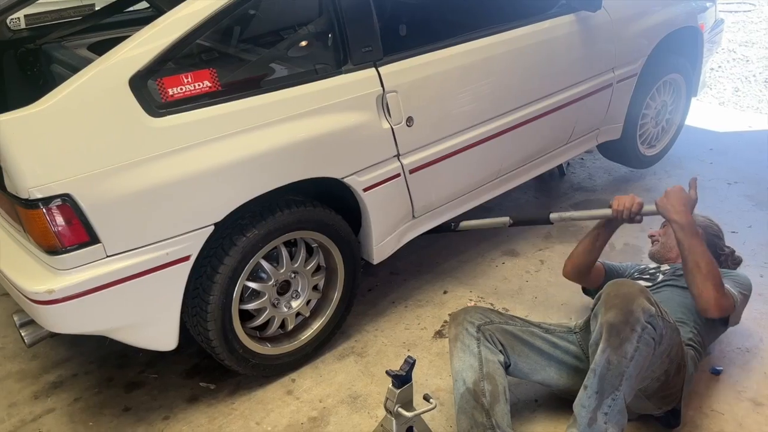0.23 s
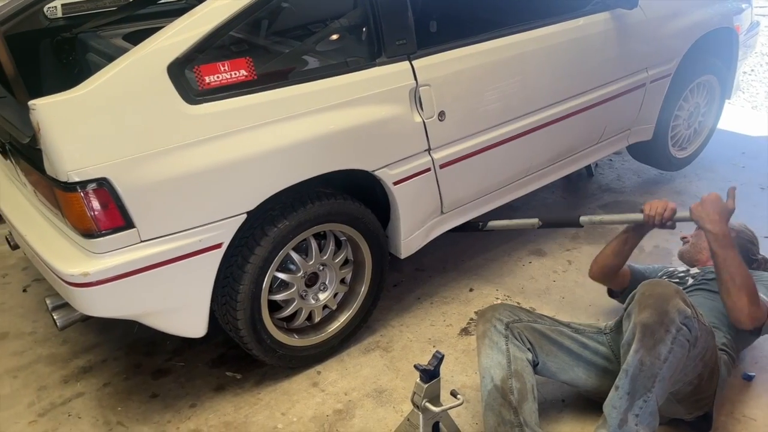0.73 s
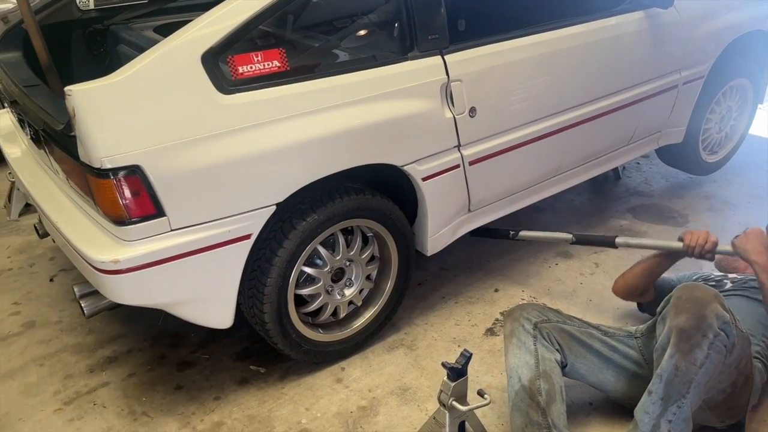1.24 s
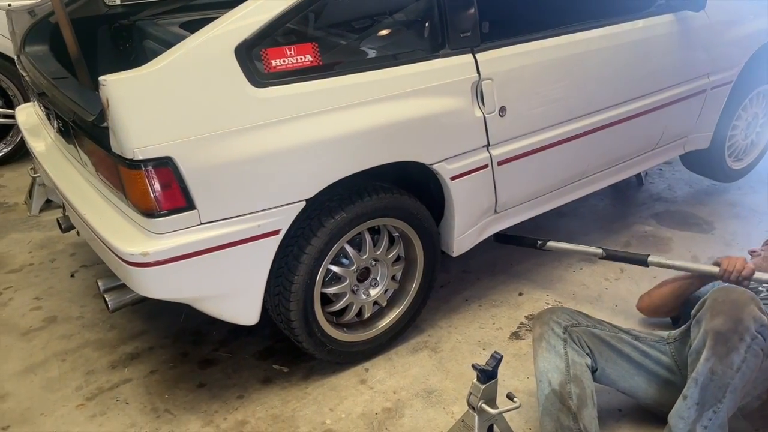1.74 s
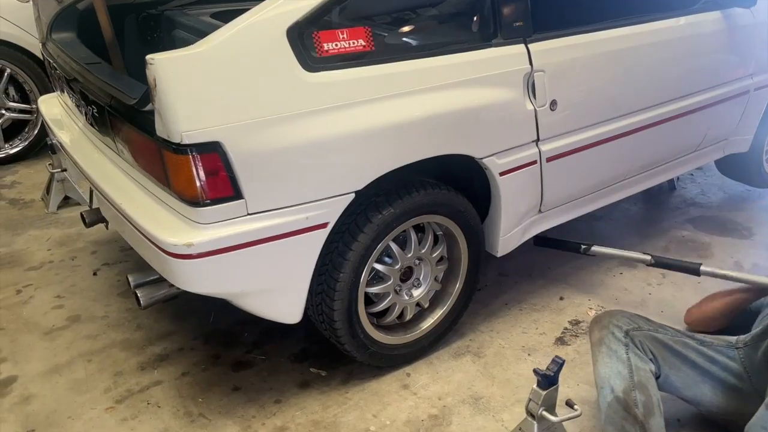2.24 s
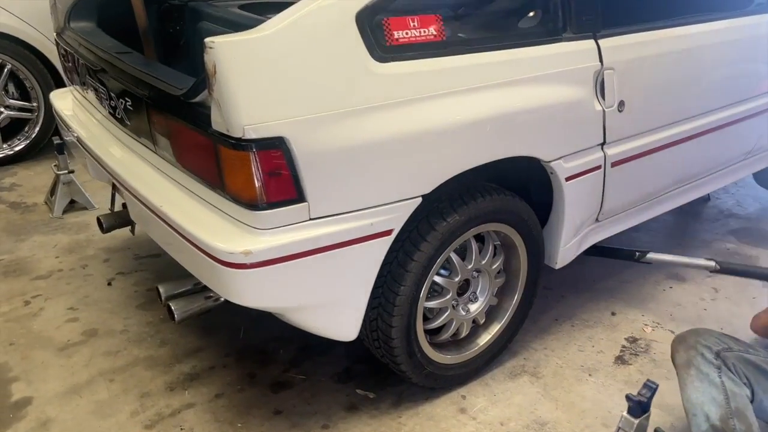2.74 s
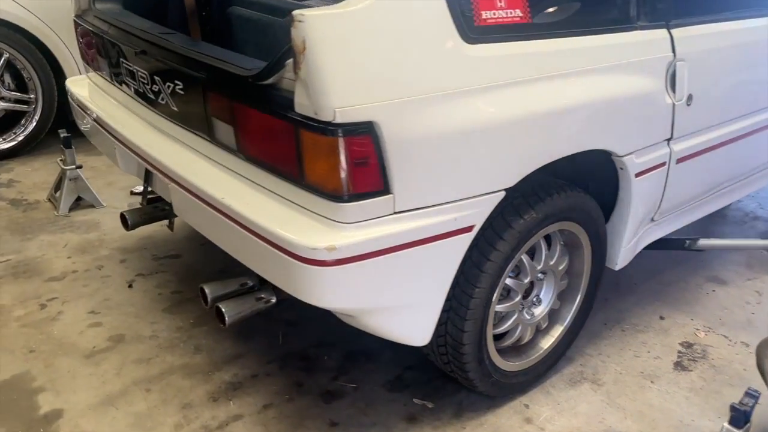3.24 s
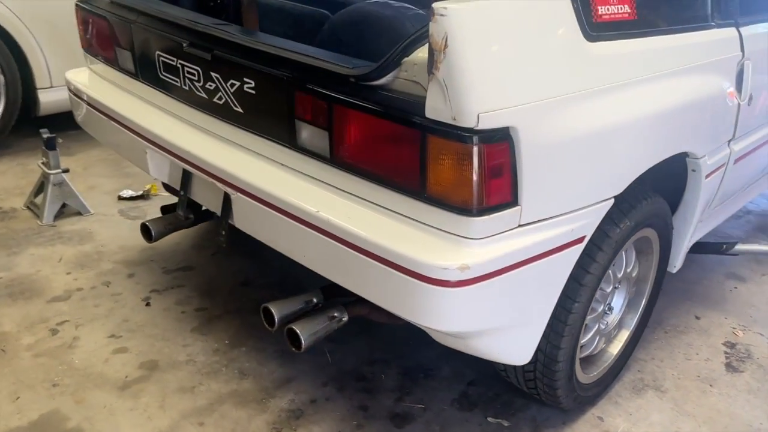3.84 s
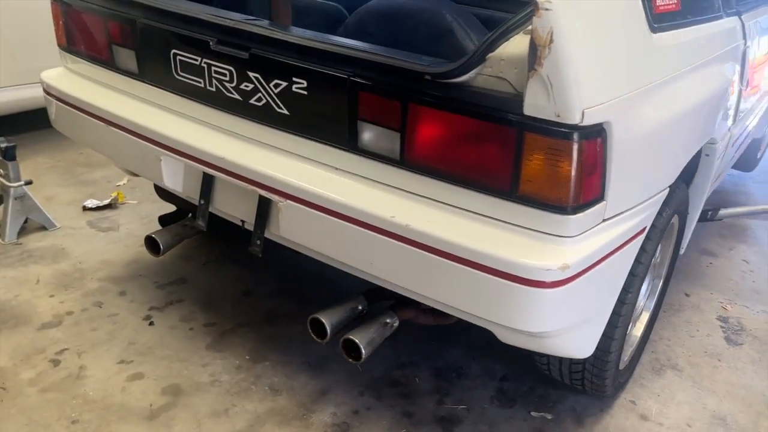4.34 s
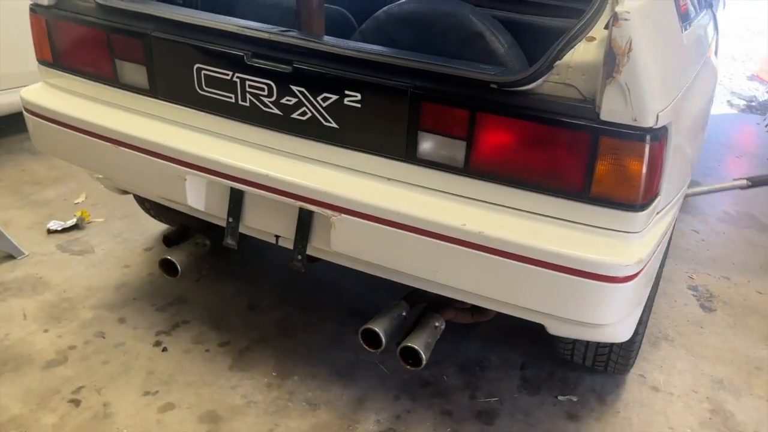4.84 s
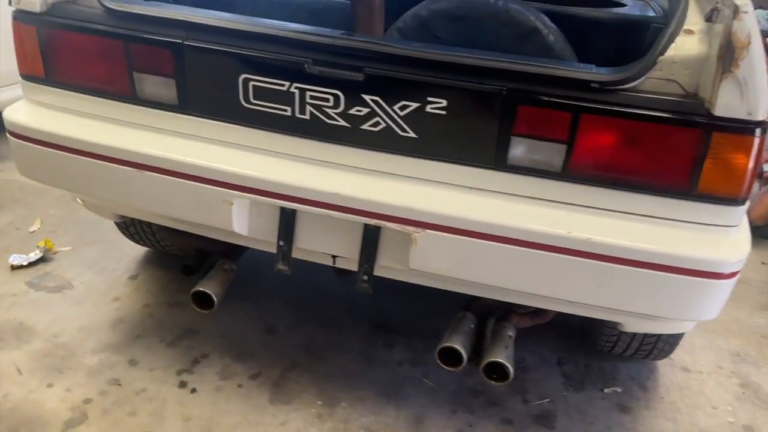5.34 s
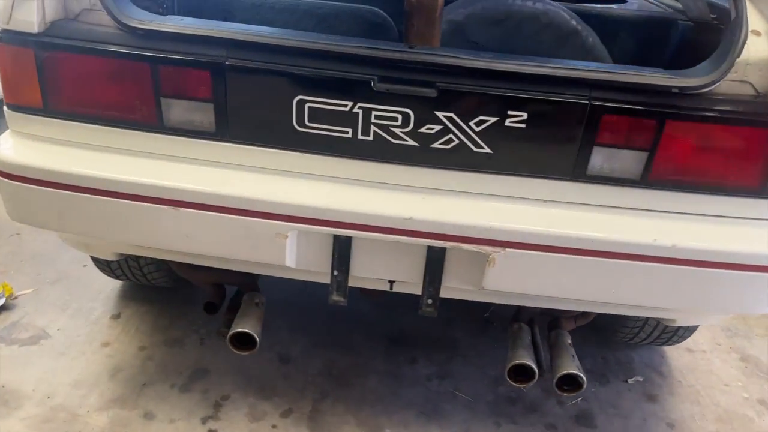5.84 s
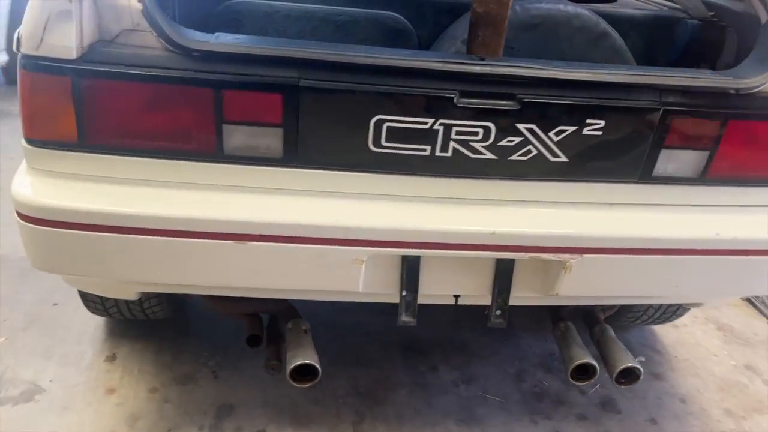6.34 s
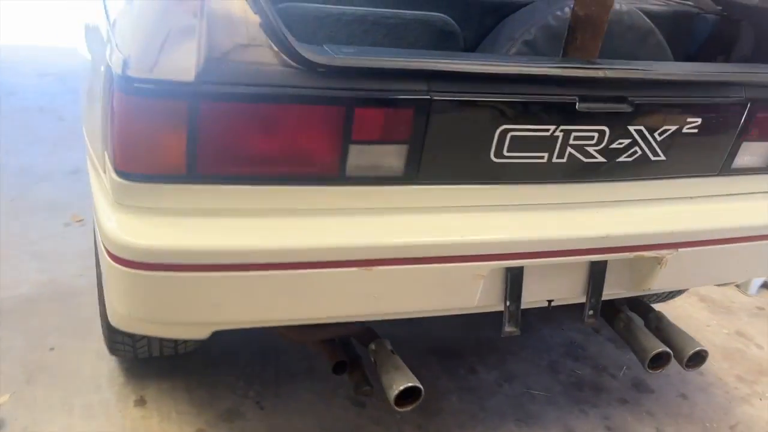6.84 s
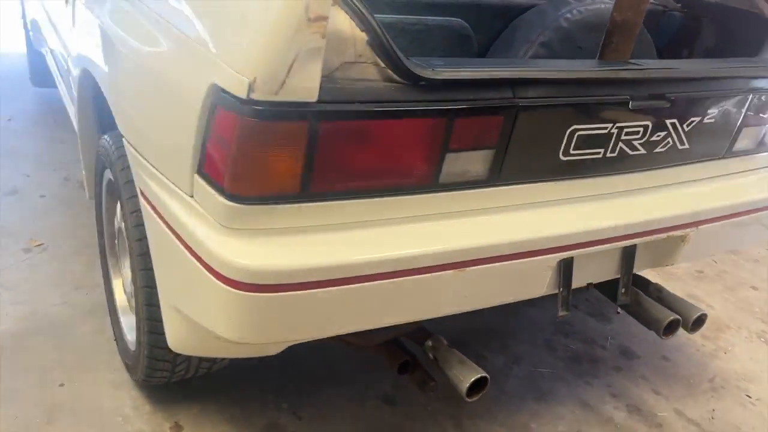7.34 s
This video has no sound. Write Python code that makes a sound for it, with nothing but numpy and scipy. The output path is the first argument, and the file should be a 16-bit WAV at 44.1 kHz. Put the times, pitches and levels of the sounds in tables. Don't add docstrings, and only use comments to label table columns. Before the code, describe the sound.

Close garage perspective, short reverberation. Steady pumping of a jack under a car: slack linkage knocks, a squeaky pin, a hard handle clank, a deep panel thump, then clicking loose links before the next stroke. Small pings, gritty snaps and shoe scuffs fill the gaps over soft rumble and airy wash. It opens with a moment of louder ambience cut to silence, and the moving microphone later passes behind the car, which shadows the treble.

```python
import sys
import numpy as np
from scipy import signal
from scipy.fft import rfft, irfft, next_fast_len
from scipy.io import wavfile
from scipy.ndimage import uniform_filter1d

SR = 44100
rng = np.random.default_rng(int(sys.argv[2]) if len(sys.argv) > 2 else 0)


def decibels_to_gain(level_db):
    exponent = np.asarray(level_db, float) / 20
    return 10 ** exponent


def transcribe(signal):
    frames = np.atleast_2d(signal).T
    limited = np.clip(frames, -1, 1)
    pcm = np.round(limited * 32767).astype(np.int16)
    wavfile.write(sys.argv[1], SR, pcm)


N = 335292


def evened(x):
    return x / np.sqrt(np.mean(x ** 2) + 1e-20)


def peaked(x):
    return x / np.sqrt(uniform_filter1d(x ** 2, 180).max() + 1e-20)


def drift(shape, size):
    return evened(uniform_filter1d(rng.standard_normal(shape), size=size))


def decay(t, t60):
    return decibels_to_gain(-60 * t / t60)


def read(points, hz, column=1):
    points = np.transpose(points)
    return np.interp(np.log(hz + 1), np.log(points[0] + 1), points[column])


def colour(x, points):
    size = next_fast_len(x.shape[-1])
    gain = decibels_to_gain(read(points, np.fft.rfftfreq(size, 1 / SR)))
    return irfft(rfft(x, size) * gain, size)[..., :x.shape[-1]]


def ring(x, modes):
    out = np.zeros(x.shape)
    for hz, width, db in modes:
        r = np.exp(-np.pi * abs(width) / SR)
        pole = r * np.exp(2j * np.pi * hz / SR)
        out += decibels_to_gain(db) * 2 * signal.lfilter([1 - r], [1, -pole], x).real
    return out


def add(mix, s, sound):
    part = mix[:, round(s * SR):][:, :sound.shape[-1]]
    part += sound[..., :part.shape[-1]]


# time_s, level_db
OPENNESS = [(0, 1), (.44, 0.1), (1.3, 0.5), (2.3, 2), (3.4, 2.5), (3.6, 1.5), (3.78, 1.5), (3.9, 0),
            (4.2, -2), (4.38, -1.5), (4.75, -3), (4.92, -2.6), (5.2, -3), (5.5, -5.5), (6.4, -4),
            (7.05, -4), (7.45, -4.5), (7.6, -4.5)]


def opening(t):
    return np.interp(t, *np.transpose(OPENNESS))


def patchy(patchy_db, frames_wide, bins_wide):
    z = signal.stft(rng.standard_normal((2, N)), nperseg=512, noverlap=384)[2]
    patches = uniform_filter1d(rng.standard_normal(z.shape[1:]), bins_wide, 0)
    patches = uniform_filter1d(patches, frames_wide, 1)
    slower = uniform_filter1d(evened(patches), 5 * frames_wide, 1)
    patches = evened(patches) + 0.8 * evened(slower)
    return signal.istft(z * decibels_to_gain(patchy_db * patches), nperseg=512, noverlap=384)[1][:, :N]


# height_s, rocking_db, panel_stir_db, drag_db
HEAVES = [(.44, 2.5, 1.5, 4.5), (1.08, 11.5, 2, 5), (1.63, 8.5, 0, 6), (2.26, 8, 0, 7),
          (2.78, 4.5, 10, 6.5), (3.39, 6, 7.5, 3), (4.1, 8.5, 2.5, -4), (4.57, 6.5, -5.5, 2.5),
          (5.16, 7.5, 4.5, 1.5), (5.8, 8, 3, 2), (6.43, 12.5, -1, 4), (7.05, 6.5, 2.5, -0.5)]
# frequency_hz, level_db
RUMBLE_SPECTRUM = [(20, -47), (40, -10), (60, 6.5), (85, 5), (115, -4.5), (200, -49)]
# pitch_hz, width_hz, level_db
HUM_MODES = [(144.1, 13.4, -9), (355.6, 8.6, -15)]
# frequency_hz, level_db
WASH_SPECTRUM = [(100, -33.5), (180, -4), (300, -4.5), (550, -0.5), (1100, -1), (1550, -4), (2100, -10),
                 (3000, -21.5), (6000, -61.5)]
# frequency_hz, level_db
HISS_SPECTRUM = [(900, -4), (1800, 7), (3000, 2.5), (4500, -4.5), (6500, -15), (8500, -16), (11000, -15),
                 (13500, -17.5), (15500, -38)]


def surroundings():
    t = np.arange(N) / SR
    open_db = opening(t)
    lift_db = np.zeros((3, N))
    for s, *lifts in HEAVES:
        lift_db += np.outer(lifts, np.interp(t, [s - 0.27, s, s + 0.27], [0, 1, 0]))
    rumble = evened(colour(patchy(0.94, 14, 2), RUMBLE_SPECTRUM))
    hum = evened(ring(rng.standard_normal((2, N)), HUM_MODES))
    wash = evened(colour(patchy(1.15, 14, 6), WASH_SPECTRUM))
    hiss = evened(colour(patchy(1.06, 15, 60), HISS_SPECTRUM))
    rumble = rumble * decibels_to_gain(-44 + 0.42 * open_db + lift_db[0])
    hum = hum * decibels_to_gain(-45 + 0.78 * open_db + lift_db[1])
    wash = wash * decibels_to_gain(-37 + open_db)
    hiss = hiss * decibels_to_gain(-48 + 0.3 * open_db + lift_db[2])
    return rumble + hum + wash + hiss


# start_s, level_db, t60_s
SNAPS = [
    (0.872, -51.5, .012),
    (1.459, -47.5, .015),
    (2.4696, -45.5, .012),
    (2.5467, -36.5, 0.006),
    (3.2103, -42, 0.013),
]
# frequency_hz, level_db
SNAP_SPECTRUM = [(800, -5), (2500, -8), (4000, 1), (7000, -5.5), (11000, -4), (15700, -13.5)]


def grit_snaps(near):
    lead = 200
    for s, db, t60 in SNAPS:
        envelope = decay(np.abs(np.arange(2000) - lead) / SR, max(t60, .003))
        burst = rng.standard_normal((2, 2000)) * envelope
        add(near, s - lead / SR, decibels_to_gain(db) * peaked(colour(burst, SNAP_SPECTRUM)))


# start_s, length_s, level_db
SCUFFS = [
    (0.437, 0.13, -58),
    (1.456, 0.078, -52),
    (1.651, 0.082, -57),
    (2.063, 0.054, -74),
    (2.788, 0.1, -56),
    (3.34, .14, -58),
    (6.486, 0.14, -48),
    (7.158, 0.12, -58),
]
# frequency_hz, level_db
DRAG_SPECTRUM = [(3000, -15), (7500, -0.5), (11500, 10), (15700, -10)]


def scuffs(steel):
    t = np.arange(9000) / SR
    for s, length_s, db in SCUFFS:
        stroke = np.minimum(t / 0.011, 1) * np.exp(-(t / length_s) ** 4)
        grit = decibels_to_gain(3.5 * drift(len(t), 200))
        drag = evened(colour(rng.standard_normal((2, len(t))), DRAG_SPECTRUM))
        add(steel, s, decibels_to_gain(db) * drag * grit * stroke)


# start_s, level_db, pitch_hz, t60_s
PINGS = [(0.321, -26, 1330, 0.044), (0.333, -25, 2000, 0.04), (.322, -31, 1350, 0.03),
         (0.32, -39, 4600, 0.037), (.506, -43, 2650, .03), (.946, -24, 1300, 0.043),
         (.957, -30, 4600, 0.014), (1.516, -31, 2400, .012), (1.538, -21.5, 2460, 0.018),
         (3.4, -38, 3600, 0.046), (2.068, -38, 2700, 0.03), (2.826, -33, 1720, 0.03),
         (1.094, -42, 3000, 0.019), (5.021, -40, 2900, .07), (3.284, -30, 1800, 0.043),
         (5.05, -33.5, 2030, 0.055), (6.237, -33, 2850, 0.059), (6.309, -39, 2900, 0.037),
         (6.337, -44, 3100, .02), (6.925, -38, 730, 0.099), (2.355, -43, 2900, .04),
         (3.838, -38, 2700, 0.15), (6.829, -31, 1700, 0.03), (2.69, -25, 2520, 0.03),
         (1.093, -47, 5100, 0.026), (1.141, -44, 5200, 0.025), (1.235, -37, 2300, .025),
         (6.808, -37.5, 2920, 0.092), (6.818, -27, 500, 0.1), (7.011, -30, 640, .05),
         (5.635, -32, 2950, .035), (5.647, -33, 2000, .07), (6.834, -31, 2030, .07),
         (3.274, -40, 5800, .025), (.956, -36, 3900, .02), (.957, -41, 5750, .02), (3.213, -36, 2800, .03)]


def pings(steel):
    t = np.arange(6000) / SR
    for s, db, hz, t60 in PINGS:
        touch = rng.standard_normal((2, len(t))) * decay(t, t60) * np.minimum(t / 0.0027, 1)
        add(steel, s, decibels_to_gain(db) * peaked(ring(touch, [(hz, 3.4 / t60, 0)])))


# pitch_hz, width_hz, level_db
STEEL_MODES = [(900, 430, 7), (1310, 120, -5), (1670, 60, -4), (1871, 90, 6), (2510, 130, -4),
               (3570, 38, -26), (3760, 180, 1)]
# frequency_hz, level_db
LOW_SPECTRUM = [(150, 17), (420, 4), (900, 7), (1400, 7), (2000, -58), (4000, -69)]
# frequency_hz, level_db
MID_SPECTRUM = [(900, -5), (1600, 7.5), (2600, 5), (4500, -9), (6500, -23), (12000, -71)]
# frequency_hz, level_db
BRIGHT_SPECTRUM = [(2000, -25), (4500, 2.5), (7000, 0.5), (9000, 6), (11000, 0), (14000, -1), (15700, -24)]


def knock(s, db, low_db, bright_db, t60, treble_db, ringing, rise_s, damping, note_share=0, note_hz=None):
    t = np.arange(7000) / SR
    t60 = max(t60, .008)
    grit = decibels_to_gain(3.6 * drift(len(t), 90))
    grit = np.maximum(np.minimum(grit, 1.7), 2.3 * np.exp(-t / 0.005))
    touches = rng.standard_normal((2, len(t))) * grit * np.minimum(t / rise_s, 1)
    chatter = touches * decay(t, t60)
    blow = chatter * decibels_to_gain(-400 * t)
    luck = rng.standard_normal(len(STEEL_MODES))
    met = []
    for (hz, width, level), z, shift in zip(STEEL_MODES, luck, luck[::-1]):
        met.append((hz * (1 + .03 * shift), damping * width, level + 4.0 * z))
    shaken = peaked(chatter) + ringing * peaked(ring(blow, met))
    lingering = 0.25 * peaked(touches * decay(t, 2.2 * t60))
    low = peaked(colour((shaken + lingering) * np.minimum(t / 0.0054, 1), LOW_SPECTRUM))
    bright = peaked(colour(chatter * decibels_to_gain(-250 * t), BRIGHT_SPECTRUM))
    mid = peaked(colour(shaken, [(hz, level + treble_db * (hz > 3200)) for hz, level in MID_SPECTRUM]))
    if note_hz is not None:
        mid = mid + note_share * peaked(ring(blow * decibels_to_gain(-700 * t), [(note_hz, 200, 0)]))
    return s - .4 * rise_s, decibels_to_gain(db) * (mid + decibels_to_gain(low_db) * low + decibels_to_gain(bright_db) * bright)


# start_s, level_db, low_db, bright_db (both relative), t60_s
STRAYS = [(0.0596, -34.5, -15, -18, 0.089), (0.432, -38, -21, -7, 0.059), (1.234, -40, -22, -31, 0.049),
          (1.8943, -34.5, -5, -12.5, 0.16), (2.4688, -33.5, -3, -9, 0.076), (2.545, -33, -3, -13, 0.0074),
          (3.1543, -50, 12, -19, 0.046), (3.6333, -47, 12, -20, 0.028), (6.4913, -33.5, -12, -26, 0.079),
          (7.1662, -44, -12, -29, 0.06), (7.201, -38, 2, -30, 0.3)]


def strays(steel):
    for row in STRAYS:
        add(steel, *knock(*row, 0, ringing=0.67, rise_s=.0012, damping=0.97))


# start_s, level_db, pitch_hz, treble_db (relative), t60_s
RATTLES = [(0.4505, -29.5, 821, -11, 0.066), (0.5038, -26, 810, -12, 0.13), (1.048, -30.5, 1305, -11, 0.07),
           (1.0943, -32, 668, -4, 0.044), (1.14, -32, 837, -12, 0.06), (1.6492, -33, 1250, -11, 0.043),
           (1.6989, -30.5, 634, -10, 0.043), (2.2302, -32, 875, -3, 0.039), (2.2754, -31, 1204, -4, 0.04),
           (2.7864, -28, 1140, -3, 0.12), (2.8289, -26, 1720, -16, 0.052), (2.8668, -33, 1190, 0, 0.084),
           (3.368, -30, 1180, -6, 0.065), (3.4, -30, 1150, -5, 0.1), (3.9355, -31, 1120, -10, 0.099),
           (3.9713, -29.5, 1150, -9, 0.098), (4.0042, -32.5, 1110, 2.5, 0.073),
           (4.5326, -28.5, 990, 1, 0.079), (4.5659, -29.5, 820, -1, 0.09), (4.5988, -27.5, 797, 2.5, 0.05),
           (5.1312, -28, 1780, -1, 0.067), (5.1626, -31, 872, 1, 0.06), (5.1941, -26.5, 1390, -1, 0.051),
           (5.228, -28.5, 1360, -1, 0.065), (5.7247, -30, 912, -3, 0.099), (5.7582, -26, 1510, -6.5, 0.093),
           (5.7904, -28.5, 915, 0, 0.073), (6.3082, -28.5, 1880, -3, 0.042), (6.3371, -30, 664, 1, 0.046),
           (6.3648, -30.5, 947, 1, 0.05), (6.3874, -33.5, 650, 4.5, 0.085),
           (6.4133, -30.5, 1140, -1, 0.056), (6.9232, -29, 660, 2, 0.048), (6.9551, -29.5, 1440, -2, 0.077),
           (6.979, -34.5, 662, 4, 0.048), (7.0105, -30, 1350, 3, 0.06)]


def rattles(steel):
    for s, db, hz, treble_db, t60 in RATTLES:
        tick = (s, db - 4.5, 0.5, -10 + treble_db, t60, treble_db)
        add(steel, *knock(*tick, ringing=0.67, rise_s=.0012, damping=0.97, note_share=0.75, note_hz=hz))


# start_s, level_db, bright_db (relative)
SLACK = [(0.3216, -32, -21), (0.8724, -51.5, 3), (0.9202, -35, -19), (1.4584, -44.5, 1), (1.471, -36, -9),
         (1.5159, -31, -10), (2.056, -38.5, -1.5), (2.07, -37, -5.5), (2.6147, -53, 2), (2.6746, -30, -14),
         (3.1883, -46, -5), (3.2122, -31.5, -6.5), (3.254, -32, -2.5), (3.7702, -37.5, -32),
         (3.821, -30, -17), (4.395, -41, -16), (4.4136, -39.5, -22), (5.0079, -37, -14), (5.018, -31, -14),
         (5.6069, -36, -20), (6.2077, -36.5, -14), (6.795, -42, -10), (6.8074, -36, -24)]


def linkage_slack(steel):
    for s, db, bright_db in SLACK:
        add(steel, *knock(s, db, 2.5, bright_db, 0.26, 0, ringing=0.58, rise_s=.0025, damping=2.5))


# pitch_hz, width_hz, level_db
PANEL_MODES = [(243, 73, 9), (310, 49, 6), (444, 18, -22), (530, 67, -12)]


def boom(s, db, hz, deep_db, upper_db, contact_s, swell_s, harmonic_db):
    t = np.arange(14000) / SR
    swell = 1 - np.exp(-t / max(swell_s, .001))
    pushed = np.exp(-(t / max(contact_s, .008)) ** 3)
    wobble = 1 + (.08 - .06 * pushed) * drift(len(t), 500)
    turns = np.cumsum(hz * wobble * (1 - 0.15 * (1 - pushed))) / SR
    swing = np.sin(2 * np.pi * turns) - decibels_to_gain(harmonic_db) * np.cos(4 * np.pi * turns)
    pan = swing * (pushed + 0.16 * (1 - pushed) * decay(t, 0.28))
    stirred = rng.standard_normal(len(t)) * decay(t, 0.23)
    upper = 0.93 * decibels_to_gain(upper_db) * peaked(ring(stirred, PANEL_MODES))
    deep = np.sin(np.pi * turns + .8) * decay(t, 0.27) * (1 - np.exp(-t / 0.016))
    return s - .003, decibels_to_gain(db) * ((pan + upper) * swell + 1.23 * decibels_to_gain(deep_db) * deep)


# start_s, level_db, pitch_hz, deep_db (relative)
NUDGES = [(0.519, -27, 106.3, -7), (1.251, -32, 125.5, -17), (2.083, -33, 146, -6), (2.233, -36, 161, -3),
          (2.892, -30.5, 107, -13), (3.585, -36.5, 157.4, -20), (4.574, -34.5, 153, 7),
          (5.198, -37, 154, 3.5), (5.794, -39, 151, 2), (6.477, -35, 117, -0.5), (7.37, -35, 144, 6.5)]


def body_nudges(body):
    for row in NUDGES:
        add(body, *boom(*row, upper_db=-10, contact_s=0.037, swell_s=0.0062, harmonic_db=-13))


# start_s, level_db, pitch_hz, deep_db (relative), contact_s
BOOMS = [(0.341, -19.5, 130, -29, 0.017), (0.956, -19, 123, -4.5, 0.021), (1.543, -20, 150.4, -10, 0.023),
         (2.137, -23.5, 155, -4, 0.048), (2.696, -24.5, 146.8, -0.5, 0.068),
         (3.281, -16.5, 153, -6.5, 0.03), (3.852, -11.5, 158.3, -14, 0.027), (4.433, -18, 160.7, -25, 0.04),
         (5.036, -12, 158.3, -8.5, 0.037), (5.637, -13, 153.4, -11, 0.033),
         (6.238, -16, 153.2, -1.5, 0.037), (6.826, -13, 159, -16, 0.017)]
# swell_s, second_harmonic_db (relative), panel_buzz_db
STRIKES = [(0.012, -7, -32.5), (.003, -9.5, -28.5), (0.0062, -14, -28.5), (0.0053, -16.5, -28.5),
           (0.0096, -13, -29.5), (0.0075, -14, -33.5), (0.0077, -27, -27.5), (0.0066, -25, -39),
           (0.013, -30, -33), (0.0057, -22, -29.5), (0.0041, -19, -25), (0.0051, -16, -37)]


def body_booms(body):
    for (s, db, hz, deep_db, contact_s), (swell_s, harmonic_db, panel_db) in zip(BOOMS, STRIKES):
        add(body, *boom(s, db, hz, deep_db, panel_db - db, contact_s, swell_s, harmonic_db))


# pitch_multiple, width_hz, level_db
PIN_MODES = [(1, 30, 29), (.982, 90, -15), (1.04, 130, -12)]
# pitch_hz, width_hz, level_db
OVERTONE_MODES = [(8400, 180, -26), (9350, 140, -2), (11200, 200, -14), (13300, 200, -18)]


def squeak(s, db, overtone_db, length_s, hz, sag, clean):
    t = np.arange(9000) / SR
    length = max(length_s, .01)
    grip = decibels_to_gain(3.5 * drift(len(t), 200))
    hold = np.exp(-t / (0.32 * length)) + 0.3 * np.exp(-(t / length) ** 2)
    hold = hold + .12 * np.exp(-t / (1.6 * max(length_s, .02)))
    slips = rng.standard_normal((2, len(t))) * grip * np.minimum(t / 0.0025, 1) * hold
    slips[:, 60] += 5.0
    waver = 1 + .01 * np.exp(-t / .006) - sag * np.minimum(t / .05, 1)
    waver = waver + (.003 + .025 * (1 - clean)) * drift((2, len(t)), 120)
    locked = np.sin(2 * np.pi * np.cumsum(hz * waver, axis=1) / SR)
    locked = locked * grip * hold * np.minimum(t / 0.0018, 1)
    modes = [(hz * (1 - .5 * sag) * multiple, width + sag * hz, level) for multiple, width, level in PIN_MODES]
    main = peaked(clean * peaked(locked) + 0.84 * peaked(ring(slips, modes)))
    overtones = decibels_to_gain(overtone_db) * peaked(ring(slips, OVERTONE_MODES))
    return s - .0025, decibels_to_gain(db) * (main + overtones)


# start_s, level_db, length_s, pitch_hz
RETURNS = [
    (0.5811, -53, .02, 4700),
    (1.177, -48, .03, 4660),
    (2.35, -48, 0.04, 4600),
    (3.495, -51, .015, 4700),
    (4.064, -52.5, 0.058, 4660),
    (4.682, -49, 0.065, 4740),
    (5.291, -58, 0.036, 4720),
]


def pin_returns(steel):
    for s, db, length_s, hz in RETURNS:
        add(steel, *squeak(s, db, -15, length_s, hz, sag=0, clean=.55))


# start_s, level_db, overtone_db (relative), length_s, pitch_hz
SQUEAKS = [(0.312, -41, -4, 0.015, 4580), (0.932, -28.5, -11.5, 0.012, 4640),
           (1.521, -29.5, -9.5, 0.054, 4610), (2.118, -46, 3, 0.04, 4520), (3.262, -36, -21, 0.045, 4540),
           (3.83, -31, -21.5, 0.043, 4570), (4.409, -37, -9, 0.035, 4800), (5.025, -34, -7, 0.054, 4570),
           (5.619, -40.5, -4, 0.05, 4760), (6.221, -32, -4, 0.014, 4620), (6.806, -42, -8, 0.034, 4610)]
GRIPS = [(.01, .6), (.005, .8), (.005, .8), (.01, .2), (.005, .8), (.005, .9), (.06, .8), (.005, .8),
         (.015, .5), (.003, .95), (.005, .6)]


def pin_squeaks(steel):
    for row, grip in zip(SQUEAKS, GRIPS):
        add(steel, *squeak(*row, *grip))


# start_s, level_db, t60_s, pitch_hz (loudest ring)
CLANKS = [(0.332, -18.5, 0.045, 2430), (0.9448, -19.5, 0.089, 2420), (0.9572, -23.5, 0.047, 2640),
          (1.536, -18.5, 0.082, 2450), (2.1282, -20, 0.095, 2440), (2.134, -21.5, 0.16, 2550),
          (2.6903, -20, 0.1, 2510), (3.273, -21.5, 0.15, 1880), (3.8439, -20, 0.069, 1810),
          (4.435, -19, 0.032, 1980), (5.0408, -20.5, 0.13, 1920), (5.636, -27, 0.46, 1980),
          (6.236, -21.5, 0.2, 1970), (6.8299, -24.5, 0.33, 1880)]
CLANK_TREBLE_DB = [-8, -13, -4, -7, -14, -6, -5, -5, -14, -15, -12, -11, -10, -11]


def handle_clanks(steel):
    for (s, db, t60, hz), treble_db in zip(CLANKS, CLANK_TREBLE_DB):
        bright_db = -17 + treble_db + 6 * opening(s)
        add(steel, *knock(s, db - 3.5, -5, bright_db, t60, treble_db,
                          ringing=0.9, rise_s=.0045, damping=3.3, note_share=0.59, note_hz=hz))


# frequency_hz, t60_s
GARAGE_DECAY = [(150, 0.34), (1000, 0.12), (4000, 0.18), (12000, 0.24)]


def garage(x):
    taps = np.zeros((2, SR // 2))
    slots = np.arange(200, SR // 2 - 20, 20)
    at = slots + rng.integers(0, 20, (2, len(slots)))
    np.put_along_axis(taps, at, rng.choice([-1., 1.], at.shape), 1)
    hz, t, z = signal.stft(taps, SR, nperseg=256)
    tail = signal.istft(z * decay(t, read(GARAGE_DECAY, hz)[:, None]), SR, nperseg=256)[1]
    return signal.fftconvolve(x, tail / np.linalg.norm(tail[0]), axes=1)[:, :N]


def scene():
    steel, body = np.zeros((2, 2, N))
    near = surroundings()
    grit_snaps(near)
    for play in (scuffs, pings, strays, rattles, linkage_slack, pin_returns, pin_squeaks, handle_clanks):
        play(steel)
    body_nudges(body)
    body_booms(body)
    return steel + decibels_to_gain(-4.0) * garage(steel) + body + decibels_to_gain(-12.5) * garage(body) + near


def gated_treble(pair):
    treble_hz, holes_hz = 7500, 8950
    hz, t, z = signal.stft(pair, SR, nperseg=1024, noverlap=768)
    low = hz[:-1, None]
    power = uniform_filter1d(abs(z) ** 2, size=4, axis=2)
    bands = power[:, :512].reshape(2, 32, 16, -1).mean(2)
    band_db = 10 * np.log10(bands + 1e-20)
    frame_db = 10 * np.log10(bands.sum((0, 1)) + 1e-20)
    band_db += 0.58 * drift(band_db.shape, 4)
    faint_db = -103 + 0.68 * (frame_db - np.median(frame_db))
    kept = band_db > np.maximum(band_db[::-1] - 7, faint_db)
    kept = np.repeat(kept, 16, axis=1) | (low < treble_hz)
    strong = power[:, :-1] > decibels_to_gain(-1.3) * np.repeat(bands, 16, axis=1)
    kept &= strong | (low < holes_hz)
    treble = (abs(z[:, hz > treble_hz]) ** 2).sum((0, 1))
    kept |= treble > 8 * np.roll(uniform_filter1d(treble, size=8), 7)
    kept = np.concatenate([kept, kept[:, -1:]], axis=1)
    return signal.istft(z * kept, nperseg=1024, noverlap=768)[1][:, :N]


def low_pass(x):
    return signal.sosfilt(signal.butter(12, 15720, fs=SR, output="sos"), x)


# frequency_hz, level_db
SELF_NOISE_SPECTRUM = [(5000, -23), (9000, -5), (12500, 3), (14200, -3), (15500, -12)]
# frequency_hz, sum_db, difference_db, likeness (0-1), phase_rad (difference on sum)
PORTS = [(89.5, -2.5, -20, 0.92, 3.5), (257, -2, -11.5, 0.53, 3.5), (698, -10.5, -13, 0.24, 2),
         (1590, -11.5, -9, 0.94, 2), (1880, -13, -18.5, 0.5, 1.1), (2870, -9, -13, .4, 0.84),
         (4740, -6, -9, 0.4, 0.7), (6320, -5, -6, 0.2, -1), (7200, -10, -8, 0.5, -2),
         (8030, -16.5, -2.5, 0.02, 5.5), (9250, -22.5, -12, 0.7, -4), (9920, -13, -18, 0.5, -4),
         (10170, -15.5, -10, 0.2, 0), (10650, -14, -36.5, .3, 4), (15100, -20.5, -14.5, .3, -12)]
# time_s, level_db
LEVEL_DIP = [
    (0, 7.5),
    (0.072, 4.5),
    (.074, -37),
    (.104, -84),
    (0.109, 2),
    (.119, 5.5),
]


def record(dry):
    size = next_fast_len(N)
    hz = np.fft.rfftfreq(size, 1 / SR)
    dry = dry + decibels_to_gain(-64) * evened(colour(rng.standard_normal((2, N)), SELF_NOISE_SPECTRUM))
    sum_db, difference_db, like, phase = (read(PORTS, hz, column) for column in range(1, 5))
    like = np.clip(like, 0, 1)
    band = (hz < 15750) / (1 + (42 / (hz + 1)) ** 6)
    first, second = rfft(dry, size) * band
    mid = irfft(first * decibels_to_gain(sum_db), size)[:N]
    mixed = like * np.exp(1j * phase) * first + np.sqrt(1 - like ** 2) * second
    side = irfft(mixed * decibels_to_gain(difference_db - 1.1), size)[:N]
    mid, side = gated_treble(np.array([mid, side]))
    level = decibels_to_gain(np.interp(np.arange(N) / SR, *np.transpose(LEVEL_DIP)))
    return low_pass(np.array([mid + side, mid - side]) * level)


dry = scene()
out = record(dry)
transcribe(out)
```